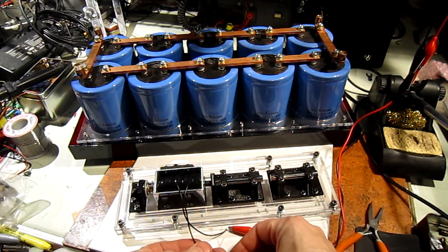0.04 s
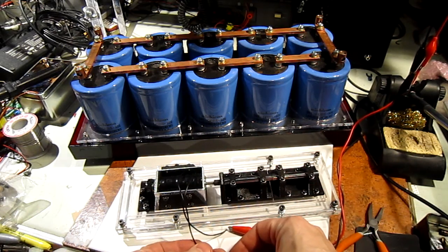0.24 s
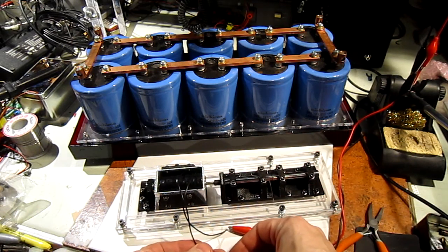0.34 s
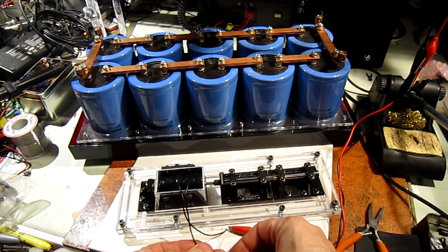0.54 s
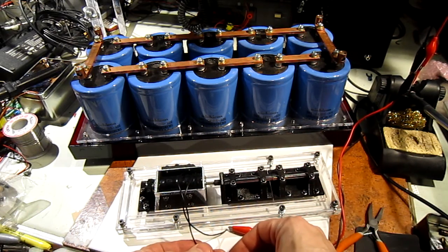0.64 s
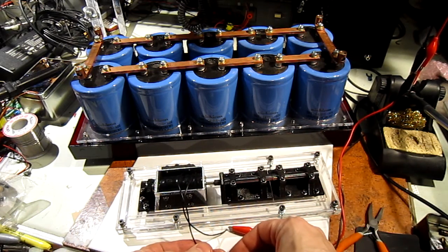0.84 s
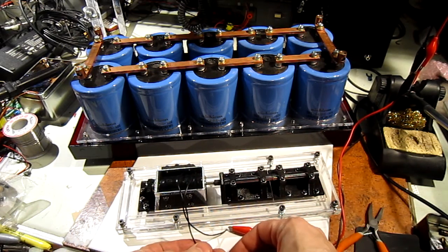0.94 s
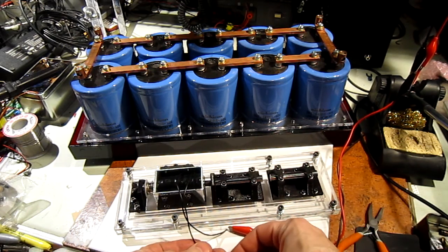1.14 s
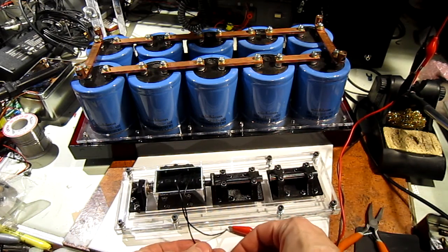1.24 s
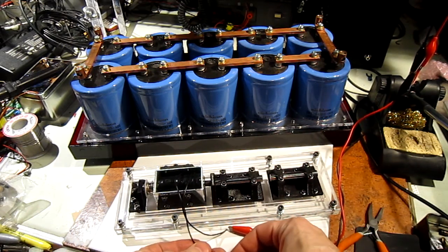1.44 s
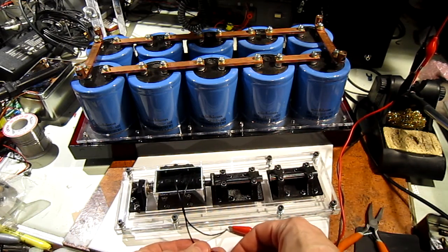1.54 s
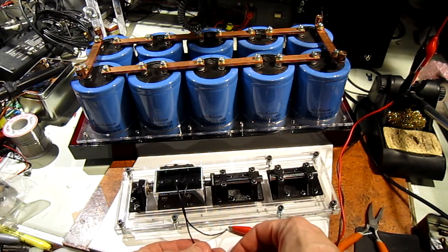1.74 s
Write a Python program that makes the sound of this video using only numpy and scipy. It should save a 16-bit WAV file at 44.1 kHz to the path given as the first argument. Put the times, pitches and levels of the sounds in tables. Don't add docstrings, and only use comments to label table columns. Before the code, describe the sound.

A solenoid switch clacks on a workbench, close and mono. At 0.2 s a brief scrape ends in a very loud, clipped steel crack with fast bounces and short ringing. Fan hum and air hiss duck, then creep back. A faint coil whine runs 0.6-0.95 s, ending in a spark snap. At 1.04 s the plunger rattles on plastic with a low boom. A faint dull knock comes at 1.7 s.

```python
import sys
import numpy as np
from scipy import signal
from scipy.fft import rfft, irfft
from scipy.io import wavfile
from scipy.ndimage import uniform_filter1d

SR = 44100
rng = np.random.default_rng(int(sys.argv[2]) if len(sys.argv) > 2 else 0)


def unload_audio(sound):
    columns = np.transpose(np.atleast_2d(sound))
    steps = np.round(np.clip(columns, -1, 1) * 32767)
    wavfile.write(sys.argv[1], SR, steps.astype(np.int16))


def decibels_to_gain(level_db):
    exponent = np.asarray(level_db, float) / 20
    return 10 ** exponent


N = 79380


def seconds():
    return np.arange(N) / SR


def unit(x):
    return x / np.sqrt(np.mean(x ** 2))


def noise(colour):
    points = np.array(colour)
    hz = np.maximum(np.arange(N // 2 + 1) * SR / N, 1)
    level_db = np.interp(np.log(hz), np.log(points[:, 0]), points[:, 1])
    return unit(irfft(rfft(rng.standard_normal(N)) * decibels_to_gain(level_db), N))


def band(x, hz, width_hz):
    return signal.lfilter(*signal.iirpeak(hz, hz / width_hz, fs=SR), x)


def fade(t60_s):
    return decibels_to_gain(-60 * seconds()[:SR // 2] / t60_s)


def walk(rate_hz):
    k = int(SR / rate_hz)
    steps = np.repeat(rng.standard_normal(N // k + 1), k)
    return unit(uniform_filter1d(uniform_filter1d(steps, k), k)[:N])


# pitch_hz, level_db (per Hz)
AIR_COLOUR = [(20, -3.5), (90, -18), (216, -11.5), (500, -18), (800, -21), (1660, -24.5), (4000, -32.5),
              (16000, -44.5)]


def room_air():
    return decibels_to_gain(-47 + 0.7 * walk(3.8)) * noise(AIR_COLOUR)


# pitch_hz, width_hz, level_db
FAN_HUMS = [(54.1, 10, -51.5), (115.9, 31, -54.5), (194, 18, -50), (221.5, 25, -46), (276.5, 36, -50.5),
            (345, 71, -55.5), (418, 47, -58)]


def fan():
    out = np.zeros(N)
    for hz, width, db in FAN_HUMS:
        hum = unit(band(band(rng.standard_normal(N), hz, width), hz, 2 * width))
        out += decibels_to_gain(db + 1.7 * walk(5.6)) * hum
    return out


def coil_whine():
    on_s, off_s = 0.58, 0.95
    live = np.interp(seconds(), [on_s - 0.05, on_s, off_s, off_s + 0.01], [0, 1, 1, 0])
    return decibels_to_gain(-56) * live * unit(band(rng.standard_normal(N), 1350, 60))


# start_s, end_s, pitch_hz, level_db
WHISTLE_SPELLS = [(.58, .82, 12030, -78), (0.584, .82, 12650, -82), (1.6, 1.85, 11930, -76),
                  (1.605, 1.85, 12500, -84)]


def supply_whistle():
    t = seconds()
    out = np.zeros(N)
    for start, end, hz, db in WHISTLE_SPELLS:
        out += decibels_to_gain(db) * (t > start) * (t < end) * unit(band(rng.standard_normal(N), hz, 120))
    return out


def bench_boom():
    start_s, hz, level_db, rise_s, t60_s = 1.046, 105, -28, 0.016, 0.2
    since = np.maximum(seconds() - start_s, 0)
    swell = decibels_to_gain(level_db - 60 * since / t60_s) * (1 - np.exp(-since / rise_s))
    return swell * np.sin(2 * np.pi * hz * since)


def clack(hits, modes, crack, tail, ring_db, crack_db, crack_t60_s, body_db, body_t60_s,
          tail_db, tail_t60_s, squarest=0):
    side_contact_db = -7
    wobble_rad, wobble_hz, wobble_full_hz = 1.2, 200, 4600
    treble_hz, treble_share = 7000, 0.7
    t = seconds()[:SR // 2]
    out = np.zeros(N + SR)
    bright, dull = noise(crack), noise(tail)
    wobble = wobble_rad * walk(wobble_hz)
    low = signal.sosfiltfilt(signal.butter(1, treble_hz, fs=SR, output="sos"), dull)
    chance = rng.standard_normal((len(hits), len(modes)))
    late = 1 - fade(0.0097)

    for k, (at, hit_db) in enumerate(hits):
        def take(x, m=0):
            return np.roll(x, -5000 * k - 3100 * m)[:len(t)]

        ring = np.zeros(len(t))
        for m, (hz, db, t60) in enumerate(modes):
            if k != squarest:
                db = db + side_contact_db + 2 * chance[k, m]
            drift = take(wobble, m)
            blur = min(hz / wobble_full_hz, 1) * (drift - drift[0])
            ring += (-1) ** m * decibels_to_gain(db) * fade(t60) * np.sin(2 * np.pi * hz * t + blur)
        snap = decibels_to_gain(crack_db) * take(bright) * fade(crack_t60_s)
        body = decibels_to_gain(body_db) * take(bright[::-1]) * fade(body_t60_s)
        room = take(low) * fade(tail_t60_s) + take(dull - low) * fade(treble_share * tail_t60_s)
        i = int(at * SR)
        out[i:i + len(t)] += decibels_to_gain(hit_db) * (decibels_to_gain(ring_db) * ring + snap + late * (body + decibels_to_gain(tail_db) * room))
    return out[:N]


# pitch_hz, level_db, t60_s (time to lose 60 dB)
KNOCK_RINGS = [(332, 6.5, 0.038), (1010, -8, 0.014), (2000, -5.5, .015), (3000, -9, .01), (6000, -12, .008),
               (11100, -14, .006)]
# pitch_hz, level_db (per Hz)
SPARK_COLOUR = [(470, -35), (800, -3), (4950, 5.5), (9200, -4.5), (10400, 3.5), (15100, -16), (16500, -32)]


def bench_knock():
    return clack([(1.6935, -37)], KNOCK_RINGS, SPARK_COLOUR, SPARK_COLOUR, ring_db=0,
                 crack_db=-20, crack_t60_s=0.01, body_db=-24, body_t60_s=0.04, tail_db=-40, tail_t60_s=0.1)


# pitch_hz, level_db, t60_s
WIRE_RINGS = [(1400, -16, .012), (3200, -5, .005), (5600, -1, .004), (8200, -5, .003), (11500, -3, .004),
              (14500, -7, .003)]


def wire_snap():
    return clack([(0.9498, -19.5)], WIRE_RINGS, SPARK_COLOUR, SPARK_COLOUR, ring_db=0,
                 crack_db=-3.5, crack_t60_s=0.0082, body_db=-16.5, body_t60_s=0.11,
                 tail_db=-36, tail_t60_s=0.13)


def slide(guide, times_s, levels_db):
    dull_start_db = 4
    t = seconds()
    start, _, end = times_s
    grains = (rng.random(N) < 0.35) * rng.standard_normal(N) * decibels_to_gain(1.5 * walk(300))
    grains = unit(grains) * (t > start) * (t < end) * decibels_to_gain(np.interp(t, times_s, levels_db))
    to_go = np.clip((end - t) / (end - start), 0, 1)
    out = np.zeros(N)
    for hz, width, db in guide:
        octaves = np.log2(hz / guide[0][0])
        level = decibels_to_gain(db - dull_start_db * octaves * to_go) * np.sqrt(SR / (2 * width))
        out += level * band(band(grains, hz, width), hz, 2 * width)
    return out


# pitch_hz, width_hz, level_db
BACK_GUIDE_RINGS = [(750, 190, 4), (1560, 180, 1), (3100, 4100, -5), (4350, 500, -3), (5800, 3000, -3)]
# start_s, full_speed_s, end_s
BACK_TIMES = (1.0, 1.026, 1.044)
# start_db, full_speed_db, end_db
BACK_LEVELS = (-55, -44, -42)


def return_scrape():
    return slide(BACK_GUIDE_RINGS, BACK_TIMES, BACK_LEVELS)


# pitch_hz, width_hz, level_db
PULL_GUIDE_RINGS = [(696, 160, -2.5), (1500, 600, -8), (2660, 1200, -11.5), (5760, 600, -12),
                    (10000, 5000, -16)]
# start_s, full_speed_s, end_s
PULL_TIMES = (.196, .217, .2286)
# start_db, full_speed_db, end_db
PULL_LEVELS = (-52, -30, -30)


def pull_scrape():
    return slide(PULL_GUIDE_RINGS, PULL_TIMES, PULL_LEVELS)


# start_s, level_db
STOP_HITS = [
    (1.0439, -24),
    (1.0444, -8),
    (1.0456, -8.5),
    (1.0481, -3.5),
    (1.0500, -8),
    (1.0525, -6.5),
    (1.0575, -15.5),
    (1.0620, -20),
]
# pitch_hz, level_db, t60_s
STOP_RINGS = [(445, -11.5, .2), (596, -10, 0.12), (930, -7, 0.11), (814, 1, 0.13), (889, -9.5, 0.13),
              (990, -6, 0.093), (1130, -7, 0.17), (1543, -1.5, 0.088), (1615, -4.5, 0.13),
              (1701, -2.5, 0.12), (2191, -8.5, 0.15), (2495, -6, 0.14), (2870, -1, 0.13), (3400, -7, 0.14)]
# pitch_hz, level_db (per Hz)
STOP_CRACK_COLOUR = [(180, -58), (300, -26), (892, -1), (2360, -8), (3130, -8.5), (4030, -9), (7610, -10),
                     (12800, -18.5), (16500, -32)]
# pitch_hz, level_db (per Hz)
STOP_TAIL_COLOUR = [(180, -43), (300, -4), (399, -7), (558, -7.5), (1580, -6.5), (1960, -6), (8420, -17),
                    (13900, -29), (16500, -38)]


def return_clack():
    return clack(STOP_HITS, STOP_RINGS, STOP_CRACK_COLOUR, STOP_TAIL_COLOUR, ring_db=-13.5,
                 crack_db=-0.61, crack_t60_s=0.012, body_db=-9.5, body_t60_s=0.059,
                 tail_db=-20, tail_t60_s=0.25, squarest=3)


# start_s, level_db
CORE_HITS = [
    (.2286, -3.5),
    (.2290, -8),
    (.2295, -1),
    (.2299, -3.5),
    (.2335, -13),
    (.2364, -8),
    (.2385, -19),
    (.2435, -17.5),
    (.2500, -23.5),
]
# pitch_hz, level_db, t60_s
CORE_RINGS = [(396, -12.5, 0.11), (862, -5.5, 0.13), (1510, -3, 0.067), (1825, -11, 0.066),
              (2384, -10.5, 0.26), (2674, 0, 0.14), (3020, 0.5, 0.078), (3135, -3.5, 0.12),
              (4530, -0.5, .07), (4575, -8, 0.32), (4640, -6, 0.3), (9120, -2.5, 0.022),
              (9184, -18.5, 0.26), (10700, -2.5, 0.037)]
# pitch_hz, level_db (per Hz)
CORE_CRACK_COLOUR = [(180, -50.5), (300, -22), (2690, -2), (3640, -9.5), (4610, -1.5), (7240, -9.5),
                     (9000, 0.5), (13200, -8.5), (16500, -25.5)]
# pitch_hz, level_db (per Hz)
CORE_TAIL_COLOUR = [(350, -11.5), (1600, -6), (2520, -2.5), (3700, -12.5), (4620, -7), (6500, -15.5),
                    (10900, -11), (14600, -19), (16500, -49)]


def pull_in_clack():
    return clack(CORE_HITS, CORE_RINGS, CORE_CRACK_COLOUR, CORE_TAIL_COLOUR, ring_db=-15,
                 crack_db=-1, crack_t60_s=0.0046, body_db=-19, body_t60_s=0.07,
                 tail_db=-25.5, tail_t60_s=0.39)


def scene():
    workshop = room_air() + fan() + coil_whine() + supply_whistle()
    hits = bench_knock() + wire_snap() + return_clack() + pull_in_clack()
    hits = signal.sosfilt(signal.butter(3, 320, "high", fs=SR, output="sos"), hits)
    scrapes = return_scrape() + pull_scrape()
    return (workshop + bench_boom() + scrapes + hits)[None]


def band_limit(x):
    return signal.sosfilt(signal.butter(12, 16610, fs=SR, output="sos"), x)


# start_s, depth_db
GAIN_DUCKS = [
    (0.234, 20.5),
    (1.052, 7),
]


def record(dry):
    fall_s, back_s = 0.068, 0.5
    duck_db = np.zeros(N)
    for at, depth in GAIN_DUCKS:
        since = np.maximum(seconds() - at, 0)
        duck_db += depth * (1 - np.exp(-since / fall_s)) * np.exp(-since / back_s)
    top_cut = signal.ellip(8, 0.2, 30, 15900, fs=SR, output="sos")
    mix = signal.sosfilt(top_cut, dry * decibels_to_gain(-duck_db))
    return band_limit(np.clip(mix, -1, 1))


dry = scene()
out = record(dry)
unload_audio(out)
```